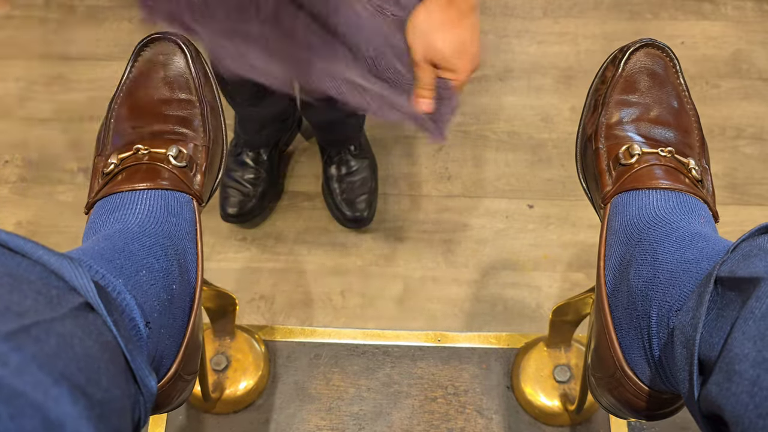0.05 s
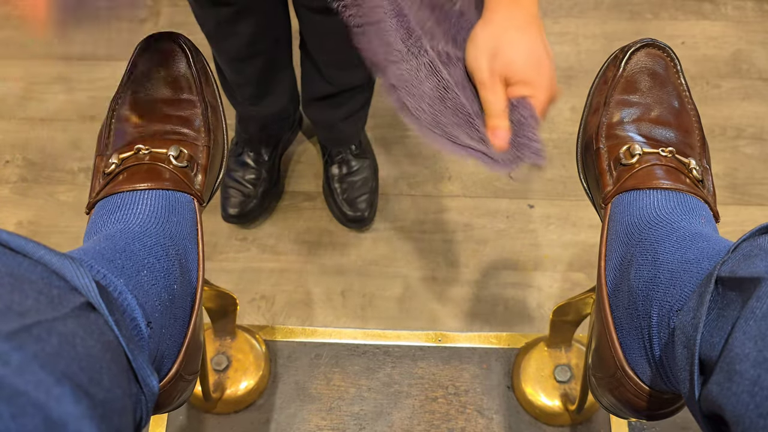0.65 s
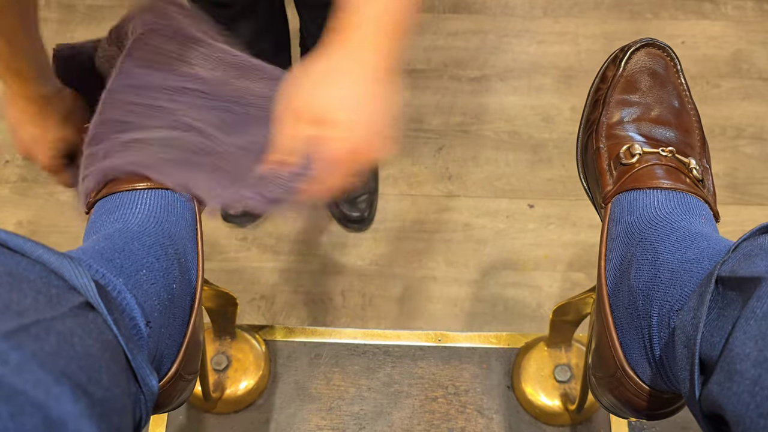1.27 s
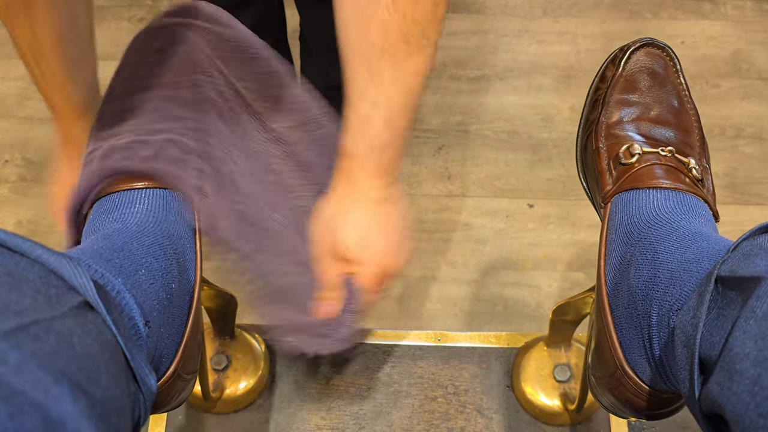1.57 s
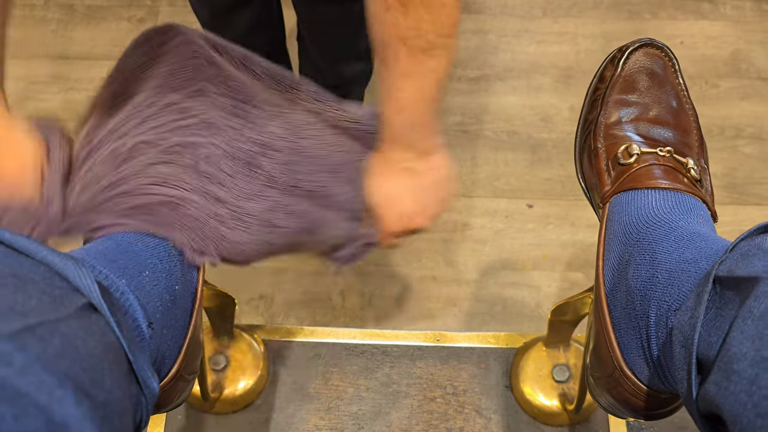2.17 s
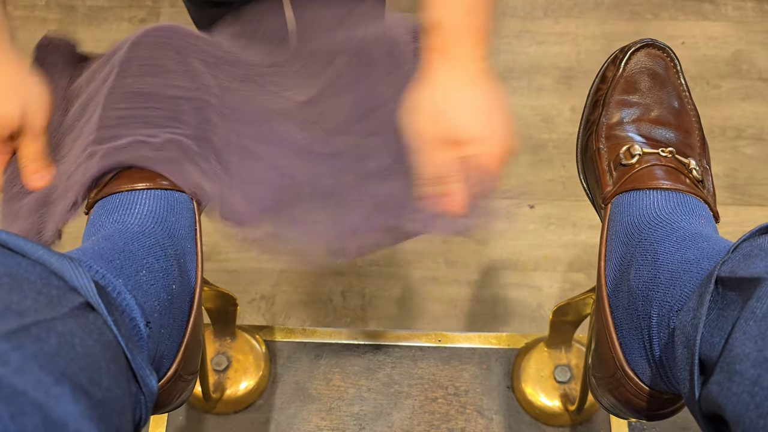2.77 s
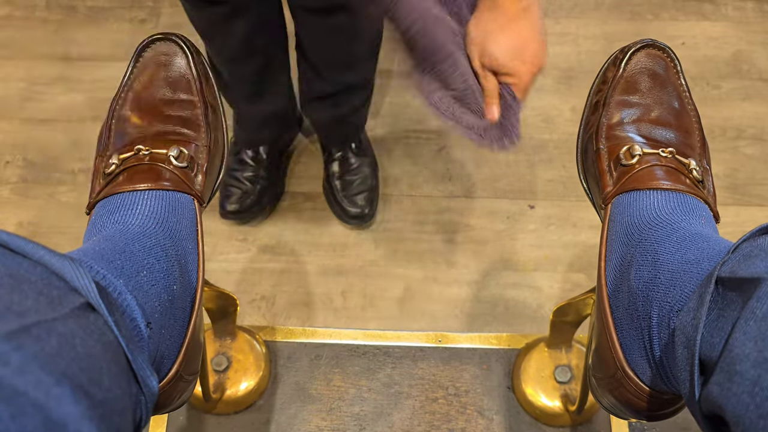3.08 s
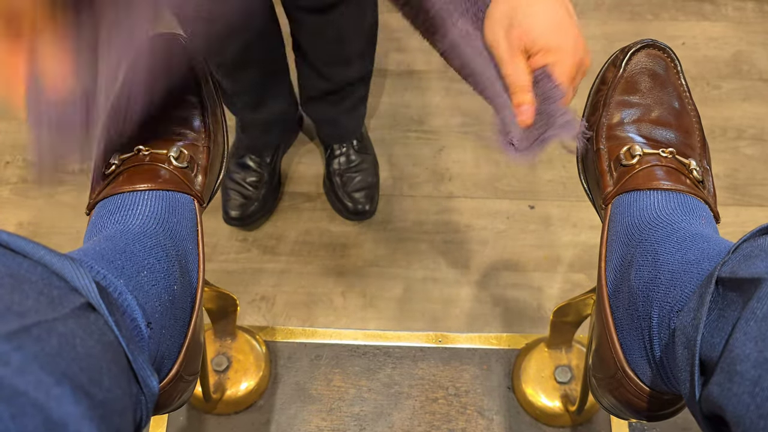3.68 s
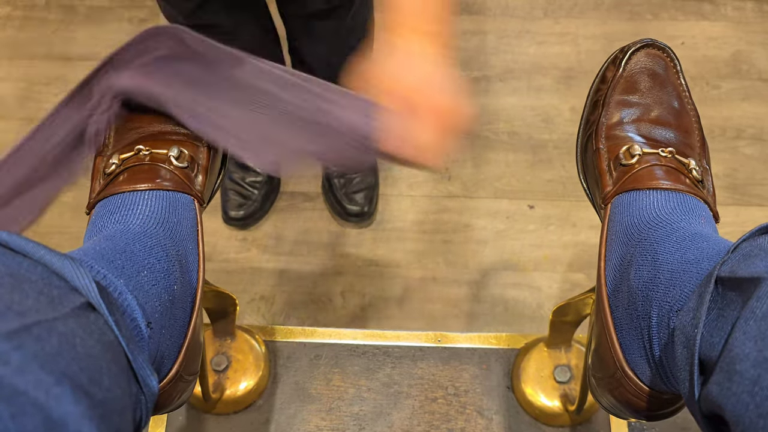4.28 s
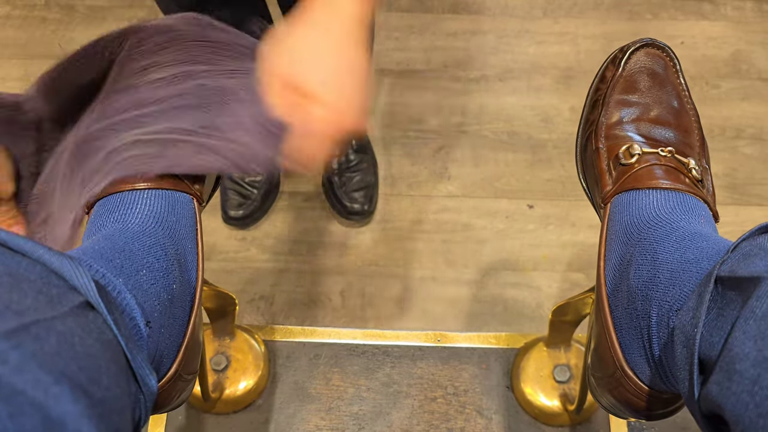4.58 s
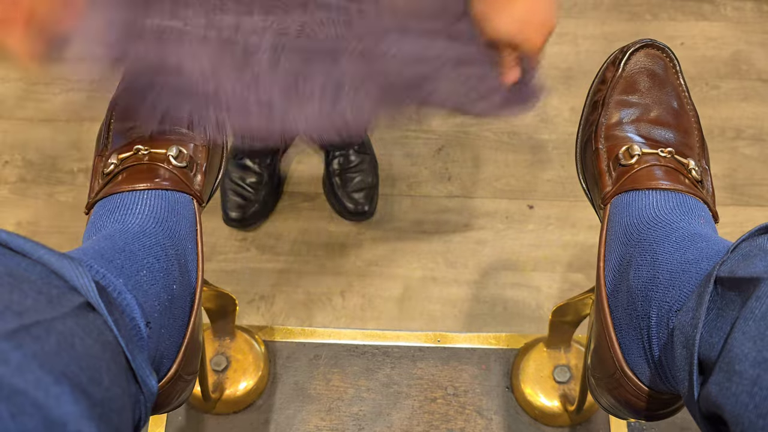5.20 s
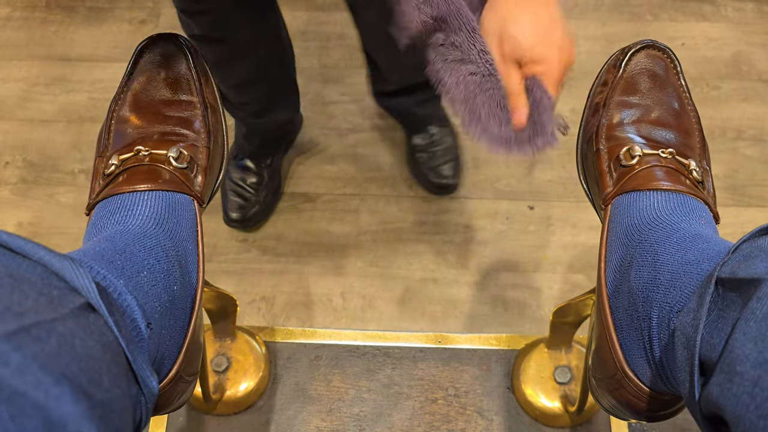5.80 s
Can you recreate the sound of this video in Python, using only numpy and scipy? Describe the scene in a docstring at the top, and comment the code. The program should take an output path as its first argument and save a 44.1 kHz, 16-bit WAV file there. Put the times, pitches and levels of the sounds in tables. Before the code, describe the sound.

A soft cloth swishes briskly over a leather shoe and snaps taut with deep pops, in a quiet small room.

```python
"""In a quiet, small shop a shoe shiner draws a soft cloth up a leather shoe: a swish of stick-slip
friction. Three times he whips it down; it hisses over the toe, snaps taut with a deep pressure pulse
and a smaller after-flap, and swishes back, while the pops excite the room's low modes. From 1.6 s he
buffs to and fro, and from 2.8 s come three more downstrokes. After 4 s he slides the cloth softly to
a new grip, and near 5 s the last three strokes begin."""
import sys
import numpy as np
from scipy import signal
from scipy.fft import rfft, irfft
from scipy.io import wavfile

SR = 44100
rng = np.random.default_rng(int(sys.argv[2]) if len(sys.argv) > 2 else 0)


def put_to_file(sound):
    """Save the sound as 16-bit audio at rate SR, in the file named by the first command-line argument."""
    columns = np.atleast_2d(sound).T  # one column per channel
    safe = np.clip(columns, -1, 1)
    whole_steps = np.round(safe * 32767)
    wavfile.write(sys.argv[1], SR, whole_steps.astype(np.int16))


N = 266805
TIME = np.arange(N) / SR


def from_db(db):
    """Decibels to amplitude ratio."""
    return np.exp(np.asarray(db) * (np.log(10) / 20))


def rms_one(x):
    """Normalisation to rms 1."""
    return x / np.sqrt(np.mean(x ** 2) + 1e-20)


def bell(u):
    """Gaussian pulse of height 1."""
    return np.exp(-u * u / 2)


def at_hz(points, hz):
    """Interpolation on a log-frequency axis."""
    known_hz, values = np.transpose(points)
    return np.interp(np.log(np.maximum(hz, 1)), np.log(known_hz), values)


def coloured(x, spectrum):
    """Spectral shaping of a steady excitation; rms 1."""
    gain = from_db(at_hz(spectrum, np.fft.rfftfreq(N, 1 / SR)))
    return rms_one(irfft(rfft(x) * gain, N))


def noise(spectrum):
    """Gaussian noise of a given spectral shape; rms 1."""
    return coloured(rng.standard_normal(N), spectrum)


def butter(x, hz, kind, order=2):
    """Causal low-, high- or band-pass filter."""
    return signal.sosfilt(signal.butter(order, hz, kind, fs=SR, output="sos"), x + 1e-18)


def ring(x, hz, t60_s):
    """Damped resonator: a unit impulse starts a sine of height 1."""
    r, w = from_db(-60 / (t60_s * SR)), 2 * np.pi * hz / SR
    return signal.lfilter([0, np.sin(w)], [1, -2 * r * np.cos(w), r * r], x + 1e-18)


def impulses(times_s, levels_db):
    """One impulse at each time."""
    out = np.zeros(N)
    out[np.round(times_s * SR).astype(int)] = from_db(levels_db)
    return out


def bursts(times_s, levels_db, rise_s, decay_s):
    """Envelope of transients: quick rise, exponential decay."""
    decays = signal.lfilter([1], [1, -np.exp(-1 / (decay_s * SR))], impulses(times_s, levels_db) + 1e-18)
    r = np.exp(-1 / (rise_s * SR))
    return signal.lfilter([(1 - r) ** 2], [1, -2 * r, r * r], decays)


def delayed(x, delay_s):
    """Propagation delay."""
    return np.interp(TIME - delay_s, TIME, x, left=0)


# background spectrum of the shop: frequency_hz, density_db
SHOP_SPECTRUM = [(15, -29.5), (25, 16.5), (170, -7), (575, -9.5), (714, -19), (1650, -19), (1790, -25),
                 (2910, -25.5), (5140, -21), (7310, -26), (11000, -31), (14400, -23.5), (16000, -25.5)]
def shop_tone(level_db=-68.5):
    """Ambient noise: a faint, steady floor, strongest in the bass."""
    return from_db(level_db) * noise(SHOP_SPECTRUM)


def swing(fastest_s, half_length_s, rounding=0.63, fall_db=13.5):
    """Level follows arm speed: dB re the rounded peak, whose flanks lose fall_db per half-length."""
    u = (TIME - fastest_s) / half_length_s
    return -fall_db * (np.sqrt(u * u + rounding ** 2) - rounding)


# upward strokes: fastest_s, friction_db, half_length_s, extra_body_db, extra_sheen_db, waft_db
LIFTS = [(.005, -56.5, 0.053, 0.5, -0.5, -49.5), (0.493, -59.5, 0.05, -2.5, -7, -50.5),
         (0.964, -57.5, 0.043, 3, -7, -54.5), (1.448, -56.5, 0.046, -1.5, 0.5, -63),
         (2.516, -56, 0.042, 0, -5, -60), (3.01, -60.5, 0.053, -0.5, -4, -58),
         (3.495, -59, 0.054, 1, -15, -53.5), (3.988, -66, 0.074, 1, -6, -68),
         (4.697, -55, 0.043, -0.5, -8.5, -58), (5.18, -57, 0.041, 0.5, -6, -58.5),
         (5.672, -61, 0.061, -0.5, -9, -54)]
def lifts():
    """Sliding friction swells and fades as the cloth is drawn up: (level curve, body, sheen) in dB."""
    return [(db + swing(s, half_s), body, sheen) for s, db, half_s, body, sheen, _ in LIFTS]


def stroke_mix():
    """Incoherent addition: stroke powers sum and weight the colour. Gives level, body, sheen in dB."""
    levels_db, body_db, sheen_db = map(np.array, zip(*downstrokes(), *lifts(), *buffs()))
    power = from_db(np.maximum(levels_db, -150)) ** 2
    total = power.sum(axis=0)
    return 10 * np.log10(total), body_db @ power / total, sheen_db @ power / total


def fibre_slips(per_s, spread_db):
    """Stick-slip of many fibres: random impulses of uneven size."""
    sizes = from_db(spread_db * np.minimum(rng.exponential(1, N), 4)) * rng.standard_normal(N)
    return sizes * (rng.random(N) < per_s / SR)


# friction spectra (cloth on leather, on polish, the shoe's body, cloth on cloth): frequency_hz, density_db
HISS_SPECTRUM = [(700, -10), (1300, -2), (1750, -5.5), (2200, -12.5), (2650, -0.5), (3100, -4.5), (3700, 1),
                 (4800, -2), (6200, -5.5), (7000, -13.5), (9000, -17.5)]
SHEEN_SPECTRUM = [(5000, -19.5), (7000, -2), (8500, 6.5), (11000, 2.5), (13000, -26), (15000, -14.5),
                  (16000, 7)]
LEATHER_SPECTRUM = [(60, -8), (150, 3), (300, 6), (430, 4.5), (560, -3), (700, -10.5), (900, -11.5),
                    (1300, -11), (2000, -30.5)]
RUSTLE_SPECTRUM = [(2000, -27), (3000, -27.5), (3700, 2), (4800, 4.5), (6400, -4), (7200, -15), (9000, -41)]
FULL_BITE_DB = -47.5  # friction level at which the cloth bites fully
def rubbing(body_db=6.5, hiss_db=1.0, rustle_db=-9, sheen_db=-1.5, bite_exponent=0.16, folds_db=0.85):
    """Friction noise: slow cloth rustles on itself; faster, it bites, hisses and drives the leather."""
    friction_db, extra_body_db, extra_sheen_db = stroke_mix()
    flicker_db = folds_db * rms_one(butter(rng.standard_normal(N), 90, "low"))
    slips = fibre_slips(per_s=16000, spread_db=2.0)
    crinkles = fibre_slips(per_s=6000, spread_db=3.0)
    hiss = from_db(hiss_db) * coloured(slips, HISS_SPECTRUM)
    sheen = from_db(sheen_db + extra_sheen_db) * coloured(crinkles, SHEEN_SPECTRUM)
    body = from_db(body_db + extra_body_db) * noise(LEATHER_SPECTRUM)
    rustle = from_db(rustle_db) * noise(RUSTLE_SPECTRUM)
    bite = from_db(bite_exponent * (friction_db - FULL_BITE_DB))
    return from_db(friction_db + flicker_db) * (bite * (hiss + sheen + body) + rustle)


def leather_hum(pitch_hz=410, t60_s=0.082, gain_db=2.5, press_exponent=1.1, width_s=.018):
    """Forced resonance: the hollow upper hums at the peak of each lift, more when pressed harder."""
    envelope = np.zeros(N)
    for s, friction_db, *_ in LIFTS:
        drive_db = FULL_BITE_DB + press_exponent * (friction_db - FULL_BITE_DB)
        envelope += from_db(drive_db) * bell((TIME - s) / width_s)
    return from_db(gain_db) * envelope * rms_one(ring(noise(LEATHER_SPECTRUM), pitch_hz, t60_s))


# spectrum of air pushed by the cloth: frequency_hz, density_db
AIR_SPECTRUM = [(25, -25), (48, 23.5), (90, 19), (170, 14.5), (300, 5.5), (450, -2.5), (700, -54.5),
                (1500, -42.5)]
def flutter(gain_db=0.5, stir_db=-79, buff_db=-10, pull_db=-62, lead_s=.06, lag_s=.077, half_s=.045):
    """Air displacement: low puffs with each rub, before a lift and as the cloth billows after it."""
    pulls = sum(from_db(pull_db + swing(s - lead_s, half_s)) for s, *_ in LIFTS)
    wafts = sum(from_db(waft_db + swing(s + lag_s, half_s)) for s, *_, waft_db in LIFTS)
    rubs = sum(from_db(db + buff_db + swing(s, rub_half_s)) for s, db, rub_half_s, *_ in BUFFS)
    return from_db(gain_db) * (from_db(stir_db) + pulls + wafts + rubs) * noise(AIR_SPECTRUM)


# catches of the weave: centre_s, length_s, pitch_hz, bandwidth_hz, level_db
SCUFFS = [(0.027, 0.027, 1390, 600, -68), (0.15, 0.14, 4720, 1410, -71.5), (0.691, 0.044, 4700, 1400, -79),
          (1.176, 0.046, 5160, 550, -73.5), (1.647, 0.063, 845, 300, -66.5),
          (2.137, 0.095, 7100, 2200, -62.5), (2.352, 0.016, 625, 200, -65), (2.654, .1, 4670, 1200, -74.5),
          (2.957, 0.12, 1270, 496, -69), (3.967, 0.092, 1290, 452, -74.5), (4.143, 0.031, 720, 350, -67.5),
          (4.19, .06, 5400, 2000, -71), (4.476, 0.25, 5300, 2200, -71), (4.496, .027, 440, 130, -63.5),
          (4.542, .032, 1220, 400, -69.5), (4.557, 0.018, 9850, 2400, -68.5),
          (5.948, 0.011, 12300, 6000, -54.5)]
def scuffs(zip_hz=4360, zip_width_hz=1400, zip_s=0.007, zip_lag_s=.004):
    """Narrow-band friction: the weave sings over an edge; each downstroke opens with such a zip."""
    zips = [(s + zip_lag_s, zip_s, zip_hz, zip_width_hz, zip_db) for s, *_, zip_db in DOWNSTROKES]
    out = np.zeros(N)
    for s, length_s, pitch_hz, width_hz, level_db in [*zips, *SCUFFS]:
        band_hz = [max(pitch_hz - width_hz / 2, 20), pitch_hz + width_hz / 2]
        weave = rms_one(butter(rng.standard_normal(SR), band_hz, "band"))
        near = slice(max(round((s - .5) * SR), 0), round((s + .5) * SR) - 1)
        envelope = bell(np.sqrt(2) * (TIME[near] - s) / length_s)
        out[near] += from_db(level_db) * weave[:len(envelope)] * envelope
    return out


# light flaps: time_s, pressure_db
FLAPS = [(0.059, -32.5), (0.0878, -26.5), (.580, -38), (1.007, -41), (1.038, -39.5), (1.286, -26.5),
         (2.861, -34), (3.06, -44), (3.079, -40), (3.568, -31), (4.704, -33), (4.768, -45.5), (4.963, -33),
         (5.264, -37), (5.751, -36.5), (5.903, -41)]
def flaps(half_width_ms=0.77, crack_offset_db=-31):
    """Weak impulses of slack cloth, as jerks: (time_s, pressure_db, half_width_ms, crack_db)."""
    return [(s, db, half_width_ms, db + crack_offset_db) for s, db in FLAPS]


def pops(jerks, floor_gain=.55, floor_delay_s=.0023):
    """Radiation by acceleration: cloth pushes air, stops dead with a sharp suck, then bellies back."""
    direct = np.zeros(N)
    for s, pressure_db, half_width_ms, _ in jerks:
        near = slice(round(s * SR) - SR // 50, round(s * SR) + SR // 25)
        u = (TIME[near] - s) / (half_width_ms / 1000)
        pulse = .36 * bell(u + 2.4) - bell(u) + .63 * bell(u - 2.7)
        direct[near] += from_db(pressure_db) * pulse
    # the floor's reflection rounds each pop into a thump
    return direct + floor_gain * delayed(direct, floor_delay_s)


# spectrum of the cloth's cracking edge: frequency_hz, density_db
CRACK_SPECTRUM = [(200, -24), (400, 7.5), (700, 6.5), (950, -12), (1300, -4.5), (2100, -22.5), (4000, -33),
                  (10000, -45.5)]
def slaps(jerks, edge_db=3.0, quiver_db=5.0, ripple_db=-22):
    """Impulse excitation: at each jerk the edge cracks, the cloth quivers and its folds ripple out."""
    times_s, pressures_db, _, cracks_db = np.transpose(jerks)
    crack = bursts(times_s, cracks_db + edge_db, rise_s=.0002, decay_s=.0045) * noise(CRACK_SPECTRUM)
    quiver = ring(impulses(times_s, cracks_db + quiver_db), hz=295, t60_s=0.062)
    ripple = bursts(times_s, pressures_db + ripple_db, rise_s=.0012, decay_s=.018) * noise(AIR_SPECTRUM)
    return crack + butter(quiver + ripple, 700, "low")


# low resonances of the shop: pitch_hz, level_db, t60_s
ROOM_MODES = [(85.6, -61, 0.13), (171.8, -44.5, 0.19), (276, -46.5, 0.32), (336.5, -53.5, 0.15),
              (406, -45.5, 0.29), (477, -49, 0.22)]
def room_modes(x, gain_db=-26, return_s=.036):
    """Standing waves: the pops return from the walls and set the room's low modes ringing."""
    echo = delayed(x, return_s)
    return from_db(gain_db) * sum(from_db(db) * ring(echo, hz, t60_s) for hz, db, t60_s in ROOM_MODES)


# reverberation times: frequency_hz, t60_s
DECAY_TIMES = [(100, 0.14), (300, 0.37), (1000, 0.31), (4000, 0.19), (14000, 0.038)]
def reverberation(x, wet_db=-19, build_s=0.0093):
    """Diffuse field: reflections build up, then decay exponentially, each octave at its own rate."""
    t, response = TIME[:SR], 0
    for low_hz in 40 * 2.0 ** np.arange(9):
        octave = butter(rng.standard_normal(SR), [low_hz, 2 * low_hz], "band")
        t60_s = at_hz(DECAY_TIMES, low_hz * np.sqrt(2))
        response += octave * from_db(-60 * t / t60_s)
    response *= 1 - np.exp(-(t / build_s) ** 2)
    return from_db(wet_db) * signal.fftconvolve(x, response / np.linalg.norm(response))[:N]


def whip(contact_s, length_s, grip_db_per_s=1910, sag_db_per_s=43, tail_db_per_s=168):
    """Friction follows contact: the cloth grips at once, slows, then leaves the toe; dB re the peak."""
    t = TIME - contact_s
    after_s = np.maximum(t - length_s, 0)
    let_go_db = 6.5 * np.minimum(after_s / 0.0064, 1)  # quick drop as contact ends
    release_db = let_go_db + tail_db_per_s * after_s
    return grip_db_per_s * np.minimum(t, 0) - sag_db_per_s * np.clip(t, 0, length_s) - release_db


# strokes down over the toe: contact_s, length_s, friction_db, extra_body_db, extra_sheen_db, zip_db
DOWNSTROKES = [(.298, 0.029, -50.5, -2.5, -4, -49.5), (.760, 0.072, -56.5, 0, -4.5, -51),
               (1.222, 0.074, -55, 1.5, -2.5, -54), (2.794, .07, -54, 1, -1, -54),
               (3.275, 0.076, -55.5, 1.5, 0.5, -51), (3.769, 0.072, -57, 2, -1.5, -58.5),
               (4.965, 0.077, -56, -0.5, 0, -56.5), (5.442, 0.077, -57, 0.5, -1.5, -62),
               (5.916, 0.069, -54, 1, -3, -59)]
def downstrokes():
    """Sliding friction sets in abruptly as the cloth whips down: (level curve, body, sheen) in dB."""
    return [(db + whip(s, length_s), body, sheen) for s, length_s, db, body, sheen, _ in DOWNSTROKES]


def sizzle(gain_db=-10, lag_s=.011, width_s=.006):
    """Stick-slip crackle: just after each opening zip the fibres tear across the polish."""
    envelope = sum(from_db(zip_db) * bell((TIME - s - lag_s) / width_s) for s, *_, zip_db in DOWNSTROKES)
    crackle = fibre_slips(per_s=4000, spread_db=3.0)
    return from_db(gain_db) * envelope * coloured(crackle, SHEEN_SPECTRUM)


# taut snaps: time_s, pressure_db, half_width_ms, crack_db, after_delay_ms, after_db, after_crack_db
SNAPS = [(0.3207, -8.5, 0.98, -39, 12.8, -48, -45), (0.7877, -5.5, 0.78, -32.5, 22, -26, -35),
         (1.2512, -9, 1.01, -44, 15, -23.5, -42.5), (2.826, -18, 0.91, -42, 16.9, -23.5, -33.5),
         (3.298, -10.5, 0.93, -42, 18.7, -25, -39.5), (3.786, -5, 0.89, -36, 18, -24, -37.5),
         (4.996, -13.5, 1.05, -43, 15, -34, -46), (5.476, -15.5, 1.07, -42, 15, -34, -45),
         (5.9558, -20, 1.37, -34, 15.5, -18, -31.5)]
def snaps(after_half_width_ms=.7):
    """Sudden tension stops the cloth, which then flaps once more: two jerks for each snap."""
    jerks = []
    for s, pressure_db, half_width_ms, crack_db, delay_ms, after_db, after_crack_db in SNAPS:
        jerks.append((s, pressure_db, half_width_ms, crack_db))
        jerks.append((s + delay_ms / 1000, after_db, after_half_width_ms, after_crack_db))
    return jerks


# creases flicking open: time_s, level_db
CREASE_TICKS = [(.656, -42), (.824, -47), (1.292, -49), (2.827, -45), (3.338, -48), (3.829, -48),
                (4.849, -44.5), (5.039, -40), (5.954, -38)]
# spectrum of a tick: frequency_hz, density_db
TICK_SPECTRUM = [(900, -29), (1750, -6), (2500, -11.5), (3600, -6), (5000, -0.5), (7500, -9), (10000, -15),
                 (16000, -29)]
def crease_ticks(gain_db=-5):
    """Broadband transients: a crease flicks open with a dry, bright tick."""
    times_s, levels_db = np.transpose(CREASE_TICKS)
    return bursts(times_s, levels_db + gain_db, rise_s=.0001, decay_s=.00063) * noise(TICK_SPECTRUM)


# rubs and slides to a new grip: fastest_s, friction_db, half_length_s, extra_body_db, extra_sheen_db
BUFFS = [(1.634, -57, 0.046, -7, -0.5), (1.804, -53.5, 0.047, -1, -1.5), (2.001, -57, 0.052, -4, -4),
         (2.152, -53, 0.059, -6, -1.5), (2.33, -55.5, 0.045, -3, -4.5), (4.185, -68.5, 0.072, -11, -3),
         (4.358, -66.5, 0.063, -12, -0.5), (4.535, -64.5, 0.078, -2, -13), (6.04, -68.5, 0.076, 18, -22)]
def buffs():
    """Reciprocating friction, one swell for each pass: (level curve, body, sheen) in dB."""
    return [(db + swing(s, half_s), body, sheen) for s, db, half_s, body, sheen in BUFFS]


def scene():
    """Superposition of direct sound, room response and ambient noise, in one channel."""
    jerks = flaps() + snaps()
    thumps = pops(jerks) + slaps(jerks)
    direct = thumps + rubbing() + leather_hum() + scuffs() + sizzle() + crease_ticks() + flutter()
    return (direct + room_modes(thumps) + reverberation(direct) + shop_tone())[None]


def record(dry, cutoff_hz=15900):
    """Band limiting: the microphone drops the deep bass, and a steep low-pass cuts the top."""
    sound = butter(dry, 41, "high", order=3)
    sound = butter(sound, 24, "high")
    return signal.sosfilt(signal.ellip(12, .1, 70, cutoff_hz, fs=SR, output="sos"), sound)


dry = scene()
out = record(dry)
put_to_file(out)
```